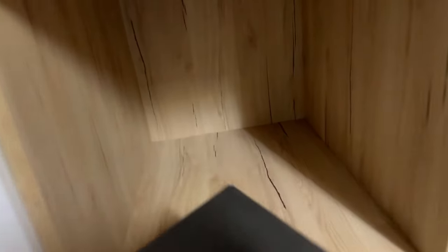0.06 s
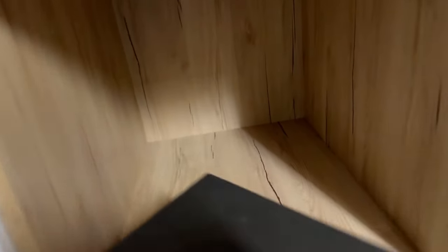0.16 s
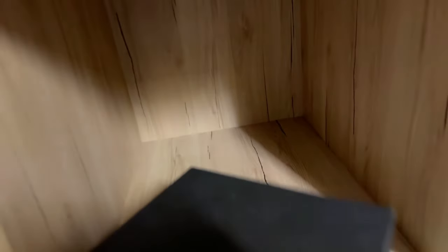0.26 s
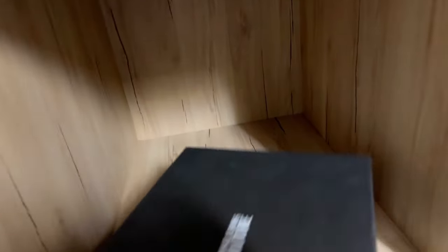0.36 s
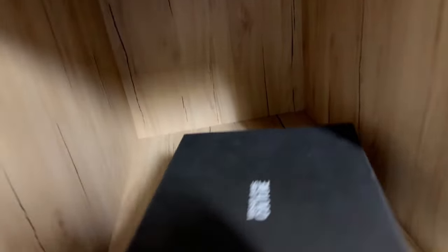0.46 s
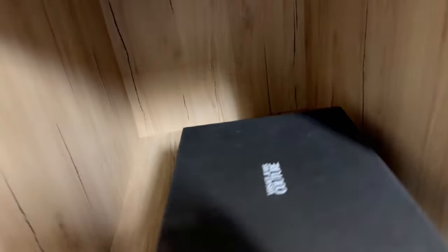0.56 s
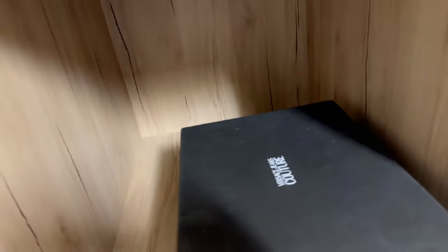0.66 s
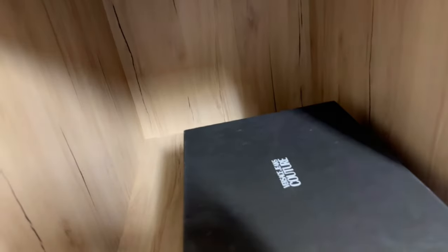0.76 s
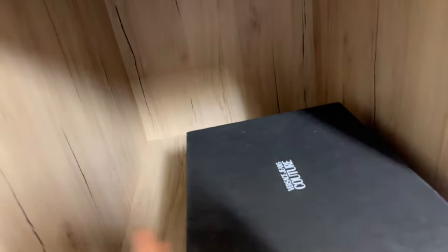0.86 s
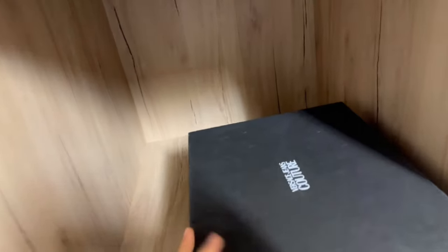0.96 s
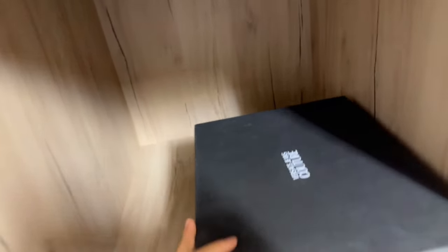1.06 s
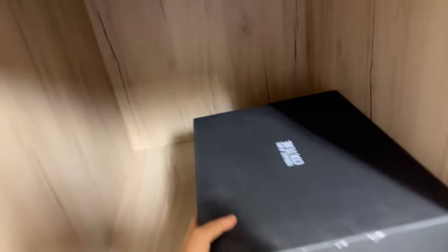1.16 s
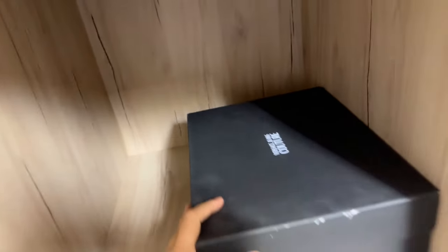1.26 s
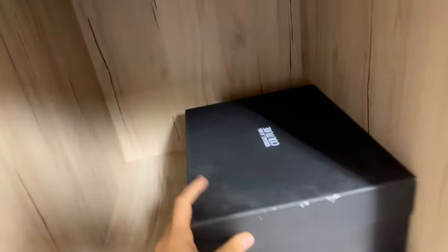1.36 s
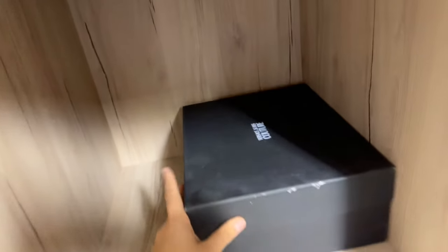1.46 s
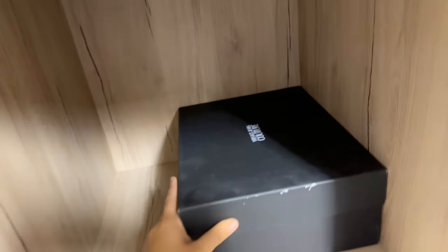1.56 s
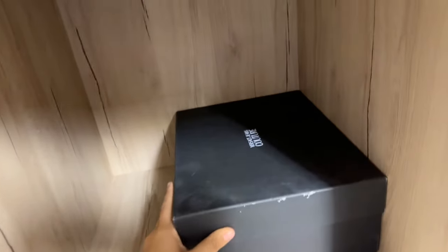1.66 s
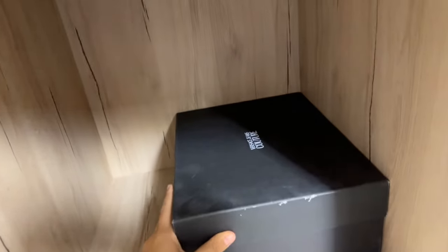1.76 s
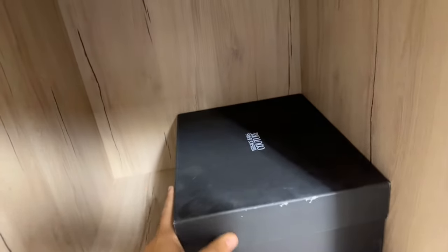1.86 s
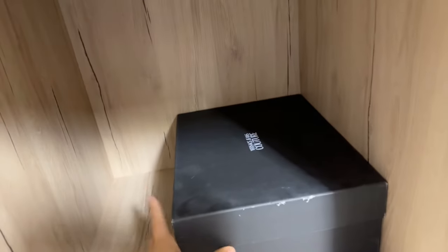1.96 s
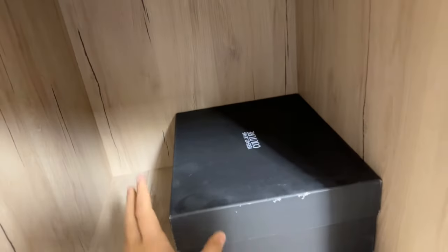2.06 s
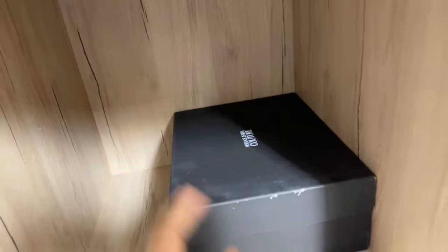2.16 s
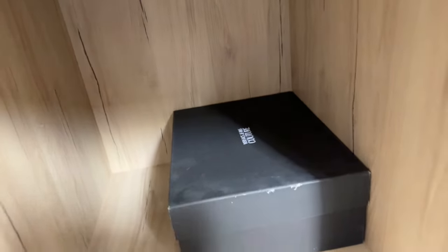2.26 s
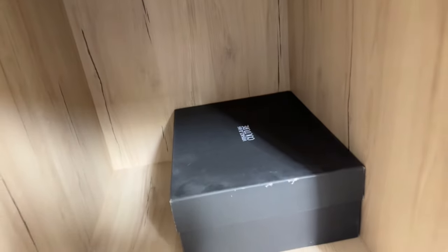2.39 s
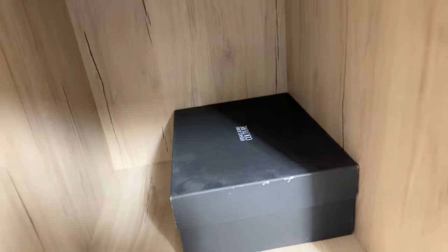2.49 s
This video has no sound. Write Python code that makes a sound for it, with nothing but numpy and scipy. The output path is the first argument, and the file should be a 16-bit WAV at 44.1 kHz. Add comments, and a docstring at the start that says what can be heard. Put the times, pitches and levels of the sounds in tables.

```python
"""A cardboard shoe box is set down in a wooden cupboard, slid along the shelf in two pushes and bumped
against the back. Each blow rings modes of box and board under slap and crack noise; the hollow box booms
as swelling low tones. The underside rasps in random grains and squeaks once, a narrow-band chirp;
fingers tick on the card in short noise bursts. Heard close, on one microphone: the direct sound stands
above a short soft room tail, with low rumble and a faint hum behind."""
import sys
import numpy as np
from scipy import signal
from scipy.fft import rfft, irfft
from scipy.io import wavfile

SR = 44100
rng = np.random.default_rng(int(sys.argv[2]) if len(sys.argv) > 2 else 0)


def transcribe(u):
    """Save the signal u as a 16-bit wav file named by the first command-line argument.

    u: samples, shape (n,) or (channels, n), limited to [-1, 1]; the rate is SR.
    q: integer samples, one column per channel.
    """
    v = np.clip(np.atleast_2d(u).T, -1, 1)
    q = np.round(v * 32767).astype(np.int16)
    wavfile.write(sys.argv[1], SR, q)


N = 110250
T = np.arange(N) / SR  # time [s]

# All levels in the colour and mode tables are relative.
# Blows on the shelf: (time [s], knock level [dB], contact [ms], dull slap level [dB],
# bright crack level [dB], edge ring level [dB])
SHELF_BLOWS = [(.0195, -53.5, 0.13, -46.5, -60.5, -80.5), (.222, -27, 5.6, -54, -55, -83.5),
               (.2285, -17.5, 1.45, -17.5, -37, -51.5), (.2310, -12, 0.73, -36, -52, -56),
               (.2355, -14, 0.8, -26.5, -50.5, -67), (.2515, -25, 4.2, -42, -61, -77),
               (.338, -16.5, 1.84, -30.5, -52, -71), (.3445, -25, 3.5, -30, -41, -65),
               (.883, -51, 0.86, -52.5, -60, -67.5), (.919, -30, 2.4, -40.5, -74, -73),
               (1.098, -30.5, 0.53, -32.5, -37, -32.5), (1.110, -34.5, 1.2, -34.5, -47, -70),
               (1.146, -26, 3.6, -32, -71, -78), (1.203, -44, 2.1, -42.5, -67, -85),
               (1.235, -27.5, 4.7, -53.5, -71.5, -95), (1.741, -41, 1.63, -51, -66.5, -74),
               (1.862, -38, 1.65, -59.5, -63, -69)]
# Bump against the back wall: (time [s], knock level [dB], contact [ms], dull slap level [dB],
# bright crack level [dB], edge ring level [dB])
WALL_BLOWS = [(1.4955, -26, 0.94, -25, -23.5, -23), (1.4995, -13, 1.1, -22.5, -29, -51)]
# Ring of the box on the shelf: (frequency [Hz], level [dB], t60 [s])
SHELF_MODES = [(160.6, -10, 0.19), (223.8, -13, 0.11), (249, -8.5, 0.089), (281, -9, 0.11),
               (338, -15.5, 0.079), (428, -6.5, .09), (503, -21.5, 0.036), (723, -4, 0.046),
               (786, -15.5, 0.047), (834, -20.5, 0.1), (1002, -7.5, .065), (1110, -12, .04),
               (1360, -21, 0.016)]
# Ring of the box against the back wall: (frequency [Hz], level [dB], t60 [s])
WALL_MODES = [(158, -5, 0.14), (183.4, -3, 0.099), (255, 0.5, 0.052), (281.6, -11.5, .07),
              (329.6, -4.5, 0.071), (502.3, -6.5, 0.1), (672, -9, 0.083), (752, -18.5, 0.034),
              (851, -8, 0.081), (982, -20, 0.065)]
# Ring of the stiff edge of the box: (frequency [Hz], level [dB], t60 [s])
EDGE_MODES = [(1850, -13, .04), (3010, -2.5, 0.022), (3240, -10, 0.081), (3510, -7.5, 0.03)]
# Colour of the dull panel slap: (frequency [Hz], level per Hz [dB])
SLAP_COLOUR = [(90, -0.5), (200, 4.5), (420, 6), (600, -2), (850, -8.5), (1150, -12.5), (1500, -19),
               (3000, -26.5), (16000, -77)]
# Colour of the bright card crack: (frequency [Hz], level per Hz [dB])
CRACK_COLOUR = [(300, -19), (900, 15.5), (1400, -8.5), (2000, 6), (3200, 6), (4300, -3), (6500, -10.5),
                (8500, -26.5), (10500, -48.5), (15500, -29)]
# Colour of the short edge snap: (frequency [Hz], level per Hz [dB])
SNAP_COLOUR = [(400, -11.5), (900, -4), (1300, -14.5), (1900, 0), (3200, 1.5), (6500, 2), (9500, -32.5),
               (15000, -20)]
# Booms of the hollow box: (time [s], level [dB], settled frequency [Hz],
# starting sharpness [share of frequency], swell [s], hold [s], t60 [s])
BOOMS = [(0.232, -13, 104, 0, .02, 0.028, 0.22), (.335, -25.5, 99.5, 0.029, 0.026, 0.01, 0.19),
         (0.72, -41, 110.8, 0.068, 0.0085, .023, 0.036), (.901, -29, 114.6, 0.12, 0.0034, 0.0098, 0.019),
         (0.922, -26.5, 100, 0.23, .011, 0.033, 0.17), (1.103, -19.5, 101, .4, 0.047, 0.006, 0.025),
         (1.16, -37.5, 102, 0.022, 0.016, 0.017, 0.25), (1.499, -14.5, 99.9, 0.82, 0.023, .016, 0.035),
         (1.54, -21.5, 104, 0.061, 0.0076, 0.0087, 0.19), (1.866, -30, 98.6, 0.28, 0.0069, 0.018, 0.093),
         (1.924, -46.5, 103.6, 0.011, 0.027, 0.039, 0.078)]
# First push: (time [s], rasp level [dB], rub level [dB])
FIRST_PUSH = [(.22, -59, -44.5), (.24, -62.5, -33.5), (.29, -51.5, -47), (.33, -53, -48), (.355, -49, -41),
              (.42, -55.5, -46), (.48, -56, -48.5), (.58, -60, -50), (.67, -65.5, -57.5), (.73, -81, -69)]
# Second push: (time [s], rasp level [dB], rub level [dB])
SECOND_PUSH = [(.875, -93, -67), (.94, -64.5, -57.5), (1.0, -58.5, -51.5), (1.095, -53.5, -49.5),
               (1.13, -50.5, -47), (1.24, -50.5, -53), (1.38, -52, -51.5), (1.49, -48, -44.5),
               (1.55, -56.5, -50.5), (1.64, -83, -103)]
# Hand brushing off the lid: (time [s], rasp level [dB], rub level [dB])
HAND_BRUSH = [(1.82, -86, -77), (1.87, -70, -59), (1.92, -73.5, -72.5), (1.98, -94, -80)]
# Rasp colour of the first push and the hand: (frequency [Hz], level per Hz [dB])
SOFT_RASP_COLOUR = [(710, -40), (1200, -24), (1610, -9.5), (2170, -15), (2580, -10), (2900, -15),
                    (4190, -18), (6870, -30.5), (9400, -45), (14300, -38), (15800, -42)]
# Rasp colour of the second push: (frequency [Hz], level per Hz [dB])
BRIGHT_RASP_COLOUR = [(710, -28), (1200, -11.5), (1550, -1.5), (1770, -1.5), (2060, 0.5), (2630, 3),
                      (3000, 1), (3800, 3.5), (5030, -10), (5850, -9.5), (7020, -14), (10000, -30),
                      (12000, -24.5), (15100, -24.5), (15800, -21)]
# Colour of the low rub: (frequency [Hz], level per Hz [dB])
RUB_COLOUR = [(70, -12), (110, 8.5), (200, 1), (300, -8), (430, 1.5), (600, -0.5), (800, -3.5), (1050, -4),
              (1400, -21), (2500, -55)]
# Squeak of card on wood, its partials: (frequency [Hz], width [Hz], level [dB])
SQUEAK_PARTIALS = [(2620, 81, -49.5), (3700, 380, -51), (6180, 360, -65), (8350, 300, -71),
                   (15000, 3200, -64.5)]
# Small finger ticks: (time [s], level [dB])
TICKS = [(.7265, -58.5), (.917, -54), (2.274, -62.5), (2.3533, -58.5)]
# Colour of a finger tick: (frequency [Hz], level per Hz [dB])
TICK_COLOUR = [(800, -5), (2500, 15), (4000, 13), (6500, -2), (9000, -19), (16000, -25)]
# Colour of the room tail: (frequency [Hz], level per Hz [dB])
TAIL_COLOUR = [(60, -7.5), (160, -4), (300, 1), (700, -10), (2000, -9), (6000, -24.5), (16000, -20.5)]
# Colour of the steady room rumble: (frequency [Hz], level per Hz [dB])
AIR_COLOUR = [(15, -32.5), (25, -18.5), (52, -4), (68, -5.5), (84, -9), (107, -17.5), (199, -29),
              (222, -25.5), (283, -27), (316, -34), (361, -30), (402, -37.5), (513, -38.5), (654, -43),
              (953, -44.5), (2140, -50.5), (15800, -79)]

SLAP_T60_S, CRACK_T60_S = 0.085, 0.022
CRACK_TAIL_DB, CRACK_TAIL_T60_S = -14.5, 0.07
SNAP_DB, SNAP_T60_S = -7.5, 0.0053  # level relative to the edge ring setting
KNOCK_LOW_HZ = 80  # the knocks are thinned below this
BOOM_SAG_S, BOOM_OVERTONE_DB = 0.014, -23
BOOM_SUB_DB, SUB_HZ = -19.5, 69
GRAINS_PER_S, GRIT_PER_S, GRIT_DB = 3200, 90, 8
JUDDER_DB, JUDDER_HZ = -1.21, 40.5
CARD_DB, CARD_T60_S = -9, 0.025  # dense short resonances of the card
RASP_RING_DB, RUB_RING_DB = -20.5, -9.5
SQUEAK_S, SQUEAK_LENGTH_S = 0.3005, 0.008  # centre, and time from it down to 1/e
TICK_T60_S = 0.0043
ROOM_DB, ROOM_T60_S, ROOM_BUILD_S = -11.5, 0.4, 0.043
AIR_DB, HUM_HZ, HUM_DB = -49, 287.3, -71
LOW_CUT_HZ, TOP_HZ = 18, 15800


def blows(table, modes):
    """Each blow rings box and board, with a dull slap of the panels and a bright snap and crack of the edge."""
    force, edge, snap, slap_power, crack_power = np.zeros((5, N))
    for s, knock_db, contact_ms, slap_db, crack_db, edge_db in table:
        onset = np.clip((T - s) * 1000 / contact_ms, 0, 1)
        force += amp(knock_db) * push(s, contact_ms)
        edge += amp(edge_db) * push(s, 0.017)
        snap += amp(edge_db + SNAP_DB) * fade(SNAP_T60_S, s)
        # overlapping slaps and cracks add in power
        slap_power += (amp(slap_db) * onset * fade(SLAP_T60_S, s)) ** 2
        crack_fade = fade(CRACK_T60_S, s) + amp(CRACK_TAIL_DB) * fade(CRACK_TAIL_T60_S, s)
        crack_power += (amp(crack_db) * onset * crack_fade) ** 2
    # alternate modes have opposite sign
    body = ring(modes[::2]) - ring(modes[1::2])
    low_cut = signal.butter(2, KNOCK_LOW_HZ, "high", fs=SR, output="sos")
    knock = through(force, signal.sosfilt(low_cut, body))
    edge_ring = through(edge, ring(EDGE_MODES))
    snap_noise = burst(snap, SNAP_COLOUR)
    slap_noise = burst(np.sqrt(slap_power), SLAP_COLOUR)
    crack_noise = burst(np.sqrt(crack_power), CRACK_COLOUR)
    return knock + edge_ring + snap_noise + slap_noise + crack_noise


def push(start, contact_ms):
    """A smooth force pulse of unit area, peaking a quarter of the contact in; longer contact is duller."""
    age = np.maximum(T - start, 0) * 1000 / contact_ms
    force = age * np.exp(-4 * age)
    return force / (force.sum() + 1e-18)


def booms():
    """The box's lowest note swells as its panels flex, settles in pitch and dies; the shelf sways below it."""
    out = np.zeros(N)
    for s, db, hz, sharp, swell, hold, t60 in BOOMS:
        age = np.maximum(T - s, 0)
        decay = np.exp(-np.log(1000) * np.maximum(age - swell - hold, 0) / t60)
        shape = np.minimum(age / swell, 1) * decay
        # phase in turns: the pitch starts sharp and sags to hz
        turns = hz * (age + sharp * BOOM_SAG_S * (1 - np.exp(-age / BOOM_SAG_S)))
        note = np.sin(2 * np.pi * turns)
        overtone = amp(BOOM_OVERTONE_DB) * np.sin(2 * np.pi * 2 * turns)
        sway = amp(BOOM_SUB_DB) * np.sin(2 * np.pi * SUB_HZ * age)
        out += amp(db) * shape * (note + overtone + sway)
    return out


def slide(curve, rasp_colour):
    """Fibres catch and slip in uneven grains, some coarser: a dry rasp, and a lower rub that rings the box."""
    s, rasp_db, rub_db = np.array(curve).T
    fibres = (rng.random(N) < GRAINS_PER_S / SR) * rng.choice([-1, 1], N)
    grit = (rng.random(N) < GRIT_PER_S / SR) * rng.standard_normal(N) * amp(GRIT_DB)
    judder = amp(JUDDER_DB * narrow(0, JUDDER_HZ * 2))  # slow random swing in level
    grains = (fibres + grit) * judder
    card_response = rng.standard_normal(N) * fade(CARD_T60_S)
    card = unit(grains) + amp(CARD_DB) * unit(through(grains, card_response))
    low_slope = [(300, -40.0), (800, -4.0)]  # (frequency [Hz], level per Hz [dB])
    rasp = unit(colour(card, low_slope + list(rasp_colour)))
    rasp = rasp + amp(RASP_RING_DB) * unit(through(grains, ring(EDGE_MODES)))
    rub = unit(colour(grains, RUB_COLOUR))
    # the rub rings all but the four lowest modes
    rub = rub + amp(RUB_RING_DB) * unit(through(grains, ring(SHELF_MODES[4:])))
    moving = (T > s[0]) * (T < s[-1])
    rasp_level = amp(np.interp(T, s, rasp_db)) * moving
    rub_level = amp(np.interp(T, s, rub_db)) * moving
    return rasp * rasp_level + rub * rub_level


def squeak():
    """The card sticks and chirps for an instant as it settles: wavering partials under one smooth swell."""
    swell = np.exp(-((T - SQUEAK_S) / SQUEAK_LENGTH_S) ** 2)
    return swell * sum(amp(db) * narrow(hz, width) for hz, width, db in SQUEAK_PARTIALS)


def ticks():
    """Light finger touches on the card, each a brief decaying burst of noise."""
    envelope = sum(amp(db) * fade(TICK_T60_S, s) for s, db in TICKS)
    return burst(envelope, TICK_COLOUR)


def room(x):
    """The quiet place around the box: a short soft tail of decaying noise, low rumble and a faint hum."""
    tail = noise(TAIL_COLOUR) * fade(ROOM_T60_S) * np.minimum(T / ROOM_BUILD_S, 1)
    # rms gain 1 from 100 to 500 Hz (0.4 Hz bins)
    tail = tail / np.sqrt(np.mean(np.abs(rfft(tail)[250:1250]) ** 2))
    reverb = amp(ROOM_DB) * through(x, tail)
    rumble = amp(AIR_DB) * noise(AIR_COLOUR)
    hum = amp(HUM_DB) * narrow(HUM_HZ, 4.5)
    return x + reverb + rumble + hum


def amp(db):
    """Level in dB to linear gain."""
    return 10 ** (np.asarray(db) / 20)


def unit(x):
    """Scale to rms 1."""
    return x / np.sqrt(np.mean(x ** 2))


def colour(x, points):
    """Causal minimum-phase filter through (frequency [Hz], level [dB]) points."""
    hz, db = np.array(points, float).T
    size = 2 * N
    log_hz = np.log(np.fft.rfftfreq(size, 1 / SR) + 1)  # +1 keeps 0 Hz finite
    log_gain = np.log(amp(np.interp(log_hz, np.log(hz), db)))
    # fold the cepstrum onto positive time, so nothing sounds early
    cepstrum = irfft(log_gain)
    cepstrum[1:N] *= 2
    cepstrum[N + 1:] = 0
    return irfft(rfft(x, size) * np.exp(rfft(cepstrum)))[:N]


def noise(points):
    """Coloured noise of rms 1."""
    return unit(colour(rng.standard_normal(N), points))


def burst(envelope, points):
    """White noise under an envelope, then coloured; rms follows the envelope."""
    white = rng.standard_normal(N)
    return colour(white * envelope, points) / np.std(colour(white, points))


def narrow(hz, width_hz):
    """A wavering tone of rms 1: noise in one narrow band."""
    offset = (np.fft.rfftfreq(N, 1 / SR) - hz) / width_hz
    spectrum = rfft(rng.standard_normal(N)) * np.exp(-2 * offset ** 2)
    return unit(irfft(spectrum, N))


def fade(t60, start=0):
    """Exponential decay from a start time, cut off after two t60."""
    out = np.zeros(N)
    live = slice(int(start * SR), int((start + 2 * t60) * SR))
    out[live] = np.exp(-np.log(1000) * (T[live] - start) / t60)
    return out


def ring(modes):
    """Impulse response of decaying sines, from (frequency [Hz], level [dB], t60 [s]) modes."""
    return sum(amp(db) * np.sin(2 * np.pi * hz * T) * fade(t60) for hz, db, t60 in modes)


def through(x, response):
    """Pass a signal through an impulse response."""
    return signal.fftconvolve(x, response)[:N]


def scene():
    """Blows, booms, sliding, squeak and ticks, all heard in the room."""
    impacts = blows(SHELF_BLOWS, SHELF_MODES) + blows(WALL_BLOWS, WALL_MODES) + booms()
    sliding = slide(FIRST_PUSH, SOFT_RASP_COLOUR) + slide(SECOND_PUSH, BRIGHT_RASP_COLOUR)
    brushing = slide(HAND_BRUSH, SOFT_RASP_COLOUR)
    return room(impacts + sliding + brushing + squeak() + ticks())[None]


def record(dry):
    """The recorder thins the deepest rumble and cuts the top."""
    low_cut = signal.butter(1, LOW_CUT_HZ, "high", fs=SR, output="sos")
    top_cut = signal.ellip(8, 0.2, 70, TOP_HZ, fs=SR, output="sos")
    return signal.sosfilt(top_cut, signal.sosfilt(low_cut, dry))


dry = scene()
out = record(dry)
transcribe(out)
```